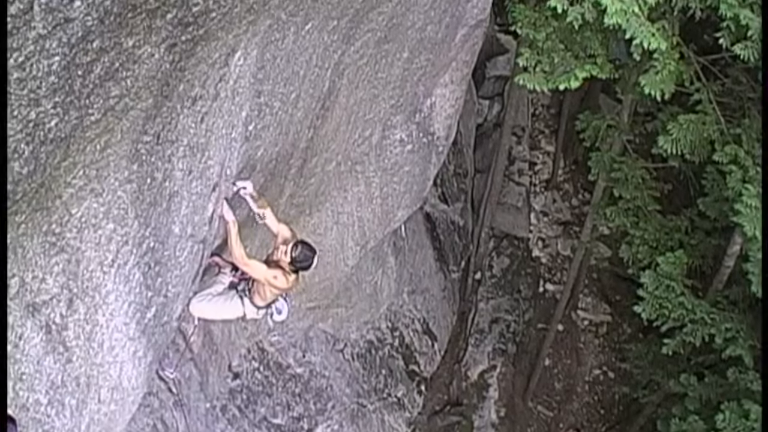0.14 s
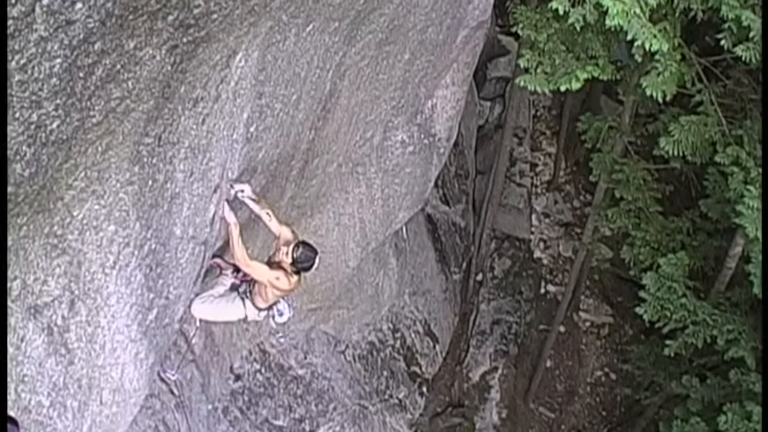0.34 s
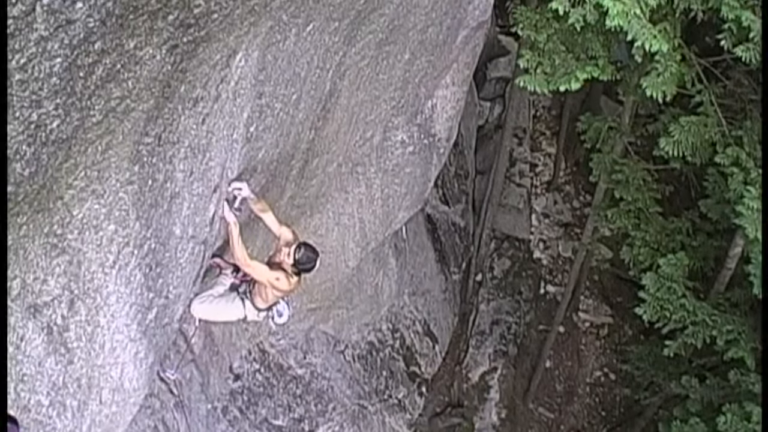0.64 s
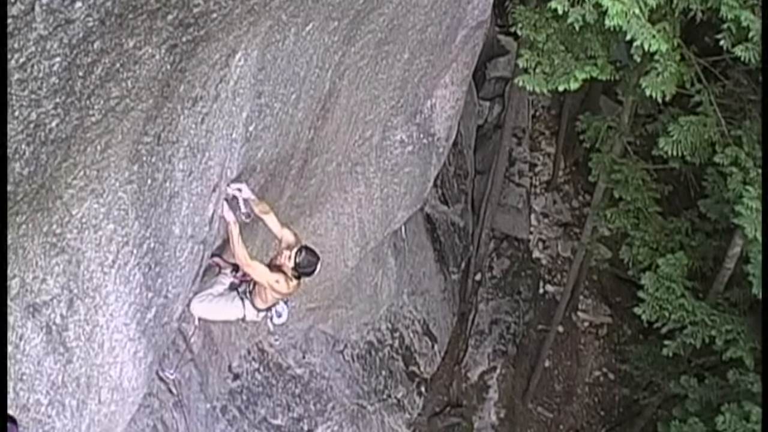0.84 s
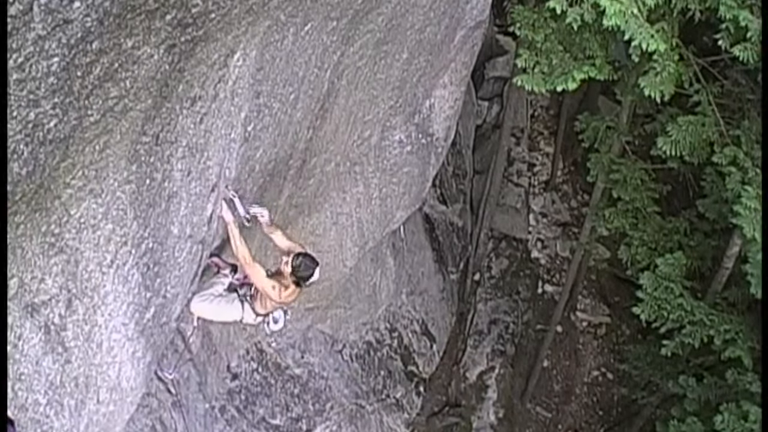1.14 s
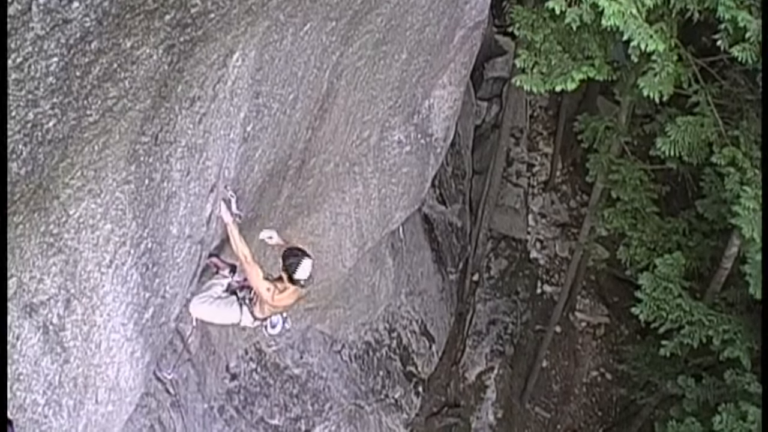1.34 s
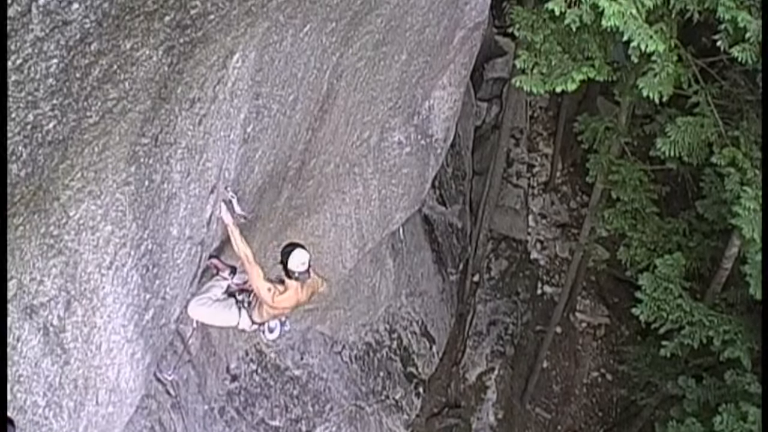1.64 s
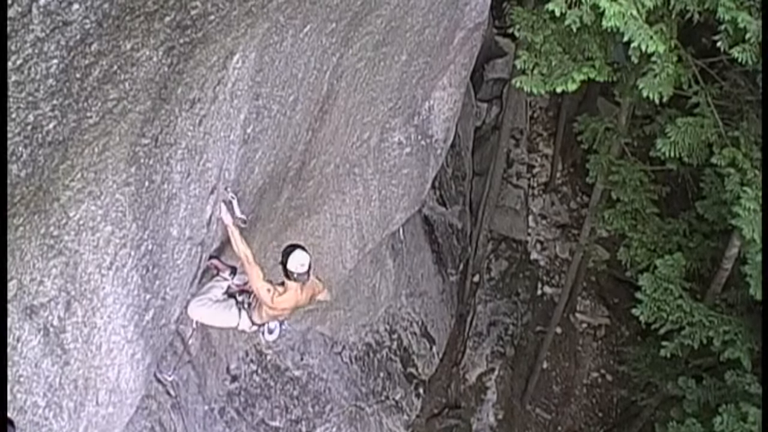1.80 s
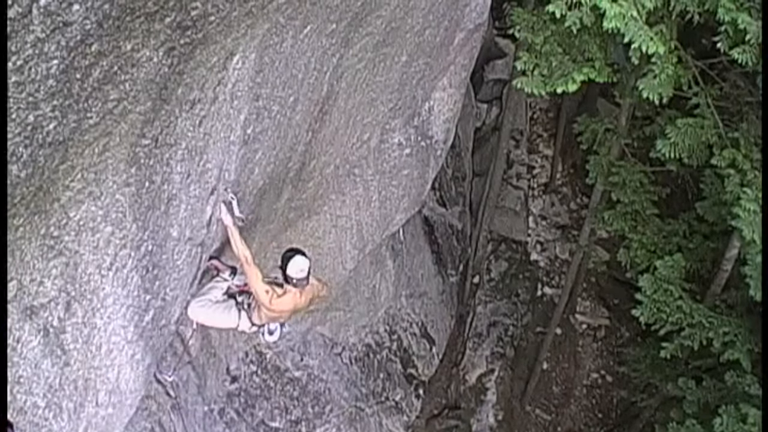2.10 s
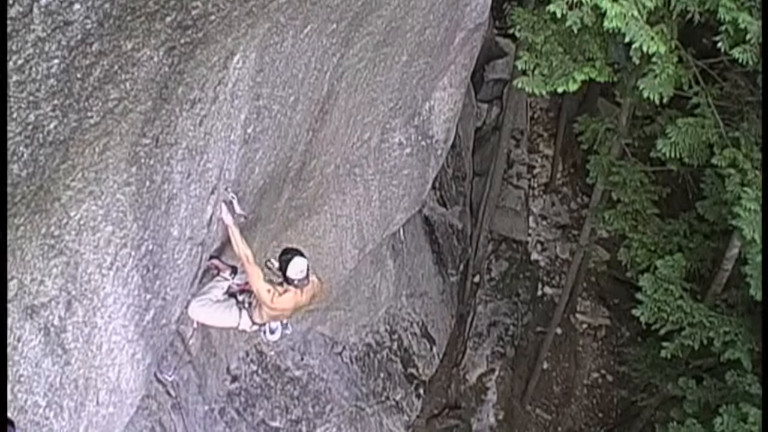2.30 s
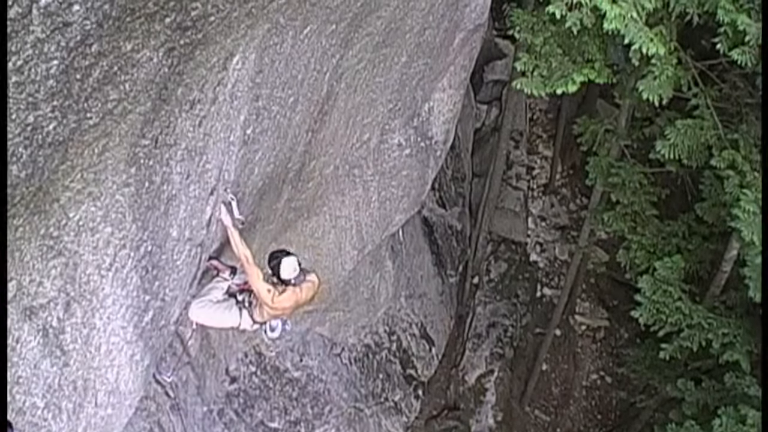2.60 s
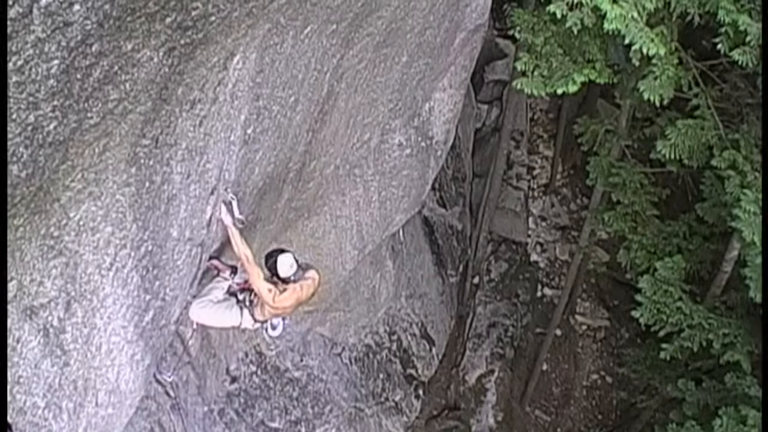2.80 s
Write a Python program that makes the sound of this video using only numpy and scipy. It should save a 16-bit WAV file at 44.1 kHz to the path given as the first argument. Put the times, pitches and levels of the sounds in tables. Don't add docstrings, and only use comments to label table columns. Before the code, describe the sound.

Carabiner gate snaps shut loudly among small dry clinks of climbing hardware on a rock face

```python
import sys
import numpy as np
from scipy import signal
from scipy.io import wavfile

SR = 44100
rng = np.random.default_rng(int(sys.argv[2]) if len(sys.argv) > 2 else 0)


def makeup_ratio(level_db):
    decades = np.asarray(level_db, float) / 20
    return 10 ** decades


def dump_mix(stems):
    frames = np.atleast_2d(stems).T
    limited = np.clip(frames, -1, 1)
    pcm = np.round(limited * 32767).astype(np.int16)
    wavfile.write(sys.argv[1], SR, pcm)


N = 130095

# [t/s, level/dB]
RUSH_LEVEL = [(0.0, -59), (0.48, -57.5), (1.54, -58.5), (1.77, -59.5), (2.13, -65.5), (2.38, -61.5),
              (2.65, -56.5), (2.95, -59)]
# [f/Hz, level/dB per Hz]
RUSH_COLOUR = [(15, -61), (25, -30.5), (160, -4), (540, -5), (620, -1), (1480, -2.5), (1780, -5),
               (2950, -10), (6000, -21.5), (7800, -62), (13200, -120)]
HISS_COLOUR = [(1470, -23), (2500, -4), (3080, -13.5), (6300, -11), (8730, -11), (12100, -16),
               (14700, -20.5), (16000, -50)]
# [f/Hz, likeness 0..1]
LIKENESS = [(60, 1), (200, 0.94), (380, 0.6), (750, 0.73), (1300, 0.34), (3300, 0.3), (5500, 0.1),
            (8500, 0.046), (13000, 0.025)]
# [f/Hz, level/dB]
BALANCE = [(60, -3), (110, 2.5), (200, 2), (380, 7), (700, 3), (1290, -0.5), (2380, -1), (4400, 0),
           (8120, 0.5), (15000, 3)]
# [f/Hz, rms level/dB]
MOTOR_LINES = [(1502, -71.5), (1798, -90.5), (2099, -73), (2401, -71), (2998, -73.5), (3300, -75.5),
               (3596, -76.5), (3898, -76.5), (4027, -92), (4199, -80)]
# [f/Hz, width/Hz, level/dB]
BEARING_WHINES = [(8420, 110, -77.5), (8800, 120, -78.5), (11200, 200, -102.5)]
# [start t/s, length/s, level/dB]
CHIRPS = [
    (0.286, 0.12, -69),
    (0.413, 0.051, -68),
    (1.872, 0.1, -72),
    (1.977, 0.028, -75),
    (2.906, 0.065, -70),
]
# [centre t/s, half length/s, level/dB]
WEBBING_RUBS = [
    (0.407, 0.031, -60),
    (0.48, 0.024, -52),
    (0.6, 0.014, -58),
    (0.623, 0.014, -60),
    (0.738, 0.011, -51.5),
    (1.91, 0.011, -66),
]
# [delay t/s, level/dB]
ECHO_RETURNS = [
    (.0162, -63),
    (.0186, -28.5),
    (.047, -29.5),
    (.059, -36.5),
    (.093, -34.5),
    (.251, -49.5),
    (.41, -67.5),
]

# [f/Hz, level/dB, t60/s]
SLING_MODES = [(1770, -3.5, 0.0034), (3270, 1, 0.0047), (3980, -3.5, 0.0032), (5600, -4, 0.0046),
               (6570, -1.5, 0.0087), (7770, -2.5, 0.0055), (9100, -13, .006), (11400, -23, 0.0033),
               (13000, -15, .005)]
KARABINER_MODES = [(4680, -5, 0.0091), (5400, -12, .008), (6830, 0.5, 0.018), (7300, -8.5, .01),
                   (8226, -14, 0.0068), (9190, -5, 0.014), (11700, -12, .012)]
NUT_MODES = [(4280, -2.5, 0.018), (5200, 5, 0.0057), (6400, -7, .005), (7140, -7, 0.0068),
             (9470, -8, 0.018), (9900, -4, 0.0055), (11200, -15, 0.0055), (13300, -18, 0.017)]
CAM_MODES = [(1700, -10, 0.019), (2470, -5, 0.0072), (3280, -10, 0.0057), (4370, -4.5, 0.019),
             (5570, -4, 0.0065), (7600, -2.5, 0.013), (9300, -7, 0.011), (11200, -17, 0.0069),
             (13300, -19, .01)]
BUCKLE_MODES = [(2435, 2, 0.031), (4830, -7, .006), (7900, -5, .0092), (9310, -3.5, 0.013),
                (12000, -13, .008)]
GATE_MODES = [(2360, -16, 0.013), (3554, -13, 0.0078), (4230, -14, 0.009), (4570, -8, 0.011),
              (5120, 2, 0.0045), (5500, -3, 0.011), (5900, -16, 0.0058), (7330, -7, 0.0092),
              (8400, -9.5, 0.0092), (9460, -7, 0.0058), (11300, -13, 0.0063), (13300, -28, 0.034),
              (14500, -24, 0.0099), (15800, -28, 0.0038)]
# [f/Hz, level/dB, t60/s]
BLUNT_MODES = [(3700, -2, .003), (5140, 1, 0.0038), (6600, -4.5, 0.003), (9300, -5.5, .001),
               (12800, -9, 0.0015)]

# [t/s, peak level/dB, brightness/dB per octave]
SLING_HITS = [(0.0336, -41, -9), (.101, -41, 1), (0.1751, -42, -3), (.2244, -55, 0), (.3974, -47, -4),
              (0.4058, -37.5, -3), (.4674, -45, -8), (.4745, -41.5, 5), (0.4791, -36, -7), (.4874, -50, 3),
              (.53, -47, 2), (.5935, -48, -6), (.6, -45, 0), (0.603, -46.5, -10), (.612, -48, -3),
              (0.633, -45, -1)]
CLACK_HITS = [(.7244, -28, -1.5), (.7292, -32, 3), (.73, -31, 3), (.7307, -31, -4), (.7314, -35, -2),
              (.7331, -29, -1), (.7342, -35, -3), (.7355, -31, 5), (.7372, -32, 4), (.7395, -39, 0),
              (.7435, -41, 3)]
KARABINER_HITS = [
    (1.698, -46, 0),
    (1.7043, -47, -8),
    (1.7045, -48, 0),
    (1.716, -51, 5.5),
    (1.7485, -33.5, -4),
    (1.7489, -34, -1),
    (1.7517, -33, -8),
    (1.7543, -39, 2.5),
    (1.774, -52, 3),
]
NUT_HITS = [
    (1.9033, -46.5, -14),
    (1.9071, -46, -12),
    (1.9655, -49, -8),
    (1.974, -33.5, 3),
    (1.9757, -37, -14),
    (1.9824, -47, 4),
    (1.986, -51, -5),
    (2.0238, -27.5, -1),
    (2.0258, -46, 8),
    (2.031, -50, 1),
]
CAM_HITS = [
    (2.6554, -34, -2),
    (2.6582, -38, 3),
    (2.6645, -33, -6),
    (2.6656, -33, 5.5),
    (2.6671, -36, 8),
    (2.668, -36.5, -3),
    (2.713, -48.5, -3),
    (2.8209, -43.5, 2.5),
    (2.824, -47, -5),
]
BUCKLE_HITS = [
    (2.0877, -57, -9.5),
    (2.5459, -40.5, 1.5),
    (2.549, -46.5, -5),
]
GATE_HITS = [
    (2.1552, -4, 0),
    (2.1568, -19, 2),
    (2.1581, -17.5, -3),
    (2.1591, -21, -2),
    (2.1615, -30, 0),
    (2.1632, -34, 2),
]

LEFT_RIGHT = np.array([[1], [-1]])


def rms_one(x):
    return x / np.sqrt(np.mean(x ** 2) + 1e-20)


def at_hz(points, hz):
    table_hz, value = np.array(points).T[:2]
    return np.interp(np.log(hz), np.log(table_hz), value)


def drift(rate_hz):
    r = np.exp(-80 * np.pi * rate_hz / SR)
    slow = signal.lfilter([1], [1, -2 * r, r * r], rng.standard_normal(N // 40 + 2002))[2000:]
    return np.interp(np.arange(N) / 40, np.arange(len(slow)), rms_one(slow))


def ring(x, hz, t60):
    r = makeup_ratio(-60 / (t60 * SR))
    w = 2 * np.pi * hz / SR
    return signal.lfilter([0, np.sin(w)], [1, -2 * r * np.cos(w), r * r], x + 1e-18)


def band(x, low_hz, high_hz):
    return signal.sosfilt(signal.butter(2, [low_hz, high_hz], "band", fs=SR, output="sos"), x + 1e-18)


def high_pass(x, hz):
    return signal.sosfilt(signal.butter(2, hz, "high", fs=SR, output="sos"), x)


def spread(mid, side, alike):
    return np.sqrt(1 + alike) * mid + np.sqrt(1 - alike) * side * LEFT_RIGHT


def banded_noise(colour, patchy_db):
    out = 0
    together = drift(1.5)
    edges = 22 * 2 ** np.arange(0, 10, .5)
    lead = 8000
    white = rng.standard_normal((2, 2, N + lead))
    steep = [(1, -90), (colour[0][0] / 2, -40)] + list(colour) + [(colour[-1][0] * 2, -50)]
    for k, (low, high) in enumerate(zip(edges, edges[1:])):
        sos = signal.butter(2, [low, high], "band", fs=SR, output="sos")
        mid, side = signal.sosfilt(sos, white[k % 2])[:, lead:]
        hz = np.sqrt(low * high)
        flicker_db = patchy_db * (0.17 * together + drift(11.0))
        balance_db = at_hz(BALANCE, hz) / 2 * LEFT_RIGHT
        gain = makeup_ratio(at_hz(steep, hz) + flicker_db + balance_db)
        out = out + gain * spread(mid, side, np.clip(at_hz(LIKENESS, hz), 0, 1))
    return rms_one(out)


def noise_floor():
    s, db = np.transpose(RUSH_LEVEL)
    rush = makeup_ratio(np.interp(np.arange(N) / SR, s, db) + 4.5) * banded_noise(RUSH_COLOUR, patchy_db=0.96)
    hiss = makeup_ratio(-65.5) * banded_noise(HISS_COLOUR, patchy_db=-2.74)
    return signal.sosfilt(signal.cheby1(8, .5, 15150, fs=SR, output="sos"), rush + hiss)


def camera():
    drum_hz, drum_db, drum_scatter_db = 149.85, -95, 7
    scan_hz, scan_db = 15734, -110
    t = np.arange(N) / SR
    comb = [(drum_hz * k, drum_db + drum_scatter_db * rng.standard_normal()) for k in range(30, 84, 2)]
    out = 0
    wow = 0.5 * drift(4.3) / 1000
    for hz, db in list(MOTOR_LINES) + comb + [(scan_hz, scan_db)]:
        phase = rng.uniform(0, 2 * np.pi) + rng.normal(0, 1.0) * np.array([[0], [1]])
        out = out + np.sqrt(2) * makeup_ratio(db) * np.sin(2 * np.pi * hz * t + min(hz, 3000) * wow + phase)
    for hz, width, db in BEARING_WHINES:
        out = out + makeup_ratio(db) * rms_one(ring(rng.standard_normal(N), hz, 2.2 / width))
    return out


def cricket():
    cricket_hz, wander_hz, tremble_db, edge_s = 7990, 36, 5, 0.015
    t = np.arange(N) / SR
    pitch = cricket_hz + wander_hz * drift(29)
    tone = np.sin(2 * np.pi * np.cumsum(pitch) / SR) * makeup_ratio(6.0 + tremble_db * drift(60))
    swell = 0
    for s, length, db in CHIRPS:
        swell = swell + makeup_ratio(db) * np.clip(np.minimum(t - s, s + length - t) / edge_s, 0, 1)
    return tone * swell


def thump(hz, db):
    t = np.maximum(np.arange(N) / SR - 2.1555, 0) * 2 * np.pi * hz
    return makeup_ratio(db + 6.3 * LEFT_RIGHT) * np.e * t * np.exp(-t)


def cliff(x):
    echo_db, bright, alike = 7, 0.56, 0.58
    low_hz, air_hz, air_t60_s = 2100, 8260, 1
    s, db = np.transpose(ECHO_RETURNS)
    t = np.arange(int(s[-1] * SR)) / SR
    mid, side = rng.standard_normal((2, SR))[:, :len(t)]
    tail = spread(mid, side, alike) * makeup_ratio(np.interp(t, s, db, left=-120) - 26)
    tail = band(tail, low_hz, SR / 3.2)
    dull = signal.sosfilt(signal.butter(2, air_hz, fs=SR, output="sos"), tail)
    tail = dull + (tail - dull) * makeup_ratio(-60 * t / air_t60_s)
    tail = makeup_ratio(echo_db) * signal.lfilter([1, -bright], [1], tail)
    return signal.fftconvolve(tail, x[None], axes=1)[:, :N]


def webbing():
    t = np.arange(N) / SR
    grit = rng.standard_normal(N) * makeup_ratio(3.0 * drift(430))
    stroke = sum(makeup_ratio(db) * np.clip(1 - abs(t - s) / half, 0, 1) for s, half, db in WEBBING_RUBS)
    return rms_one(band(grit, 1900, 8450)) * stroke


def gear(modes, hits, trim_db, crack_db, crack_hz):
    crack_s, crack_high_hz = 0.0017, 10200
    pivot_hz, mode_scatter_db = 5000, 3.4
    s, hit_db, bright_db = np.transpose(hits)
    at = (s * SR).astype(int)
    t = np.arange(400) / SR
    scatter = rng.standard_normal((len(hits), 14))
    noise = rng.standard_normal((len(hits), len(t)))
    out = np.zeros(N)
    cracks = makeup_ratio(hit_db + crack_db)[:, None] * noise * np.exp(-t / crack_s)
    np.add.at(out, at[:, None] + np.arange(len(t)), cracks)
    out = band(band(out, crack_hz, crack_high_hz), crack_hz, SR / 2.2)
    for m, (hz, db, t60) in enumerate(modes):
        tint_db = bright_db * np.log2(hz / pivot_hz) + mode_scatter_db * scatter[:, m]
        clicks = np.zeros(N)
        clicks[at] = makeup_ratio(hit_db + db + trim_db + tint_db)
        out += (-1) ** m * ring(clicks, hz, t60)
    return out


def ports(x):
    bounce = high_pass(np.roll(x, int(0.00034 * SR)), 7400)
    return x * makeup_ratio(0.6 * LEFT_RIGHT) + makeup_ratio(-9) * bounce * LEFT_RIGHT


def gear_rack():
    rack = gear(SLING_MODES, SLING_HITS, trim_db=-7.0, crack_db=-9.5, crack_hz=1960)
    rack += gear(SLING_MODES, CLACK_HITS, trim_db=-8.5, crack_db=-10.5, crack_hz=2040)
    rack += gear(KARABINER_MODES, KARABINER_HITS, trim_db=-4.5, crack_db=-6.5, crack_hz=3800)
    rack += gear(NUT_MODES, NUT_HITS, trim_db=-8.5, crack_db=-4, crack_hz=3260)
    rack += gear(CAM_MODES, CAM_HITS, trim_db=-7.0, crack_db=-4.5, crack_hz=1800)
    rack += gear(BUCKLE_MODES, BUCKLE_HITS, trim_db=-5, crack_db=-4, crack_hz=2200)
    return high_pass(rack + webbing(), 1200)


def gate_snap():
    snap = gear(GATE_MODES, GATE_HITS, trim_db=-6, crack_db=-22, crack_hz=3200)
    blunt = gear(BLUNT_MODES, GATE_HITS[:1], trim_db=-4, crack_db=-60, crack_hz=3000)
    return high_pass(snap, 1200), blunt


def scene():
    rack = gear_rack()
    snap, blunt = gate_snap()
    floor = noise_floor()
    echo = cliff(rack + makeup_ratio(-3) * snap + blunt)
    push = thump(520, -45) + thump(40, -66)
    return ports(rack + snap) + echo + push + floor + camera() + cricket()


def top_cut(x):
    return signal.sosfilt(signal.butter(12, 16620, fs=SR, output="sos"), x)


def record(dry):
    matrix_hz, matrix_q = 624, 0.61
    w = 2 * np.pi * matrix_hz / SR
    a = np.sin(w) / (2 * matrix_q)
    poles = np.array([1 + a, -2 * np.cos(w), 1 - a])
    turned_right = signal.lfilter(poles[::-1], poles, dry[1])
    pair = np.array([dry[0], turned_right])
    mix = signal.sosfilt(signal.cheby2(10, 50, 16600, fs=SR, output="sos"), pair)
    return top_cut(mix)


dry = scene()
out = record(dry)
dump_mix(out)
```